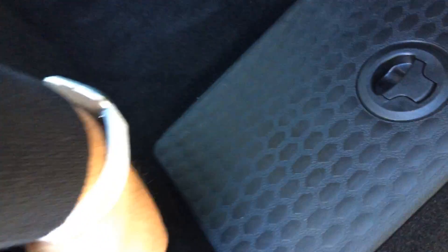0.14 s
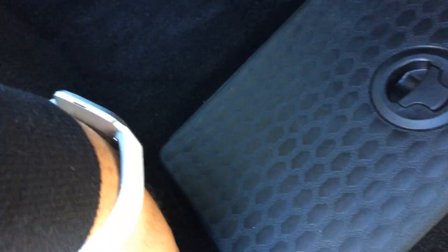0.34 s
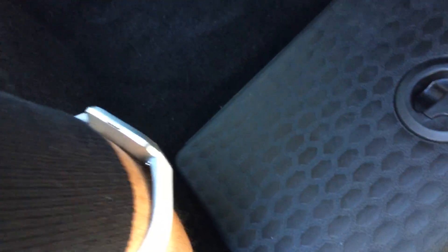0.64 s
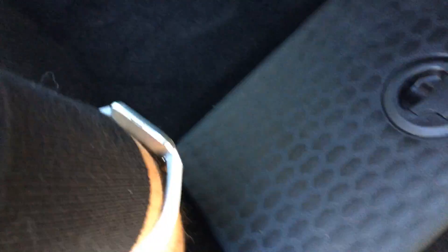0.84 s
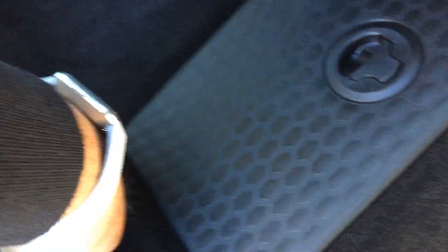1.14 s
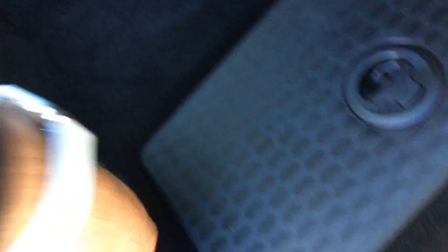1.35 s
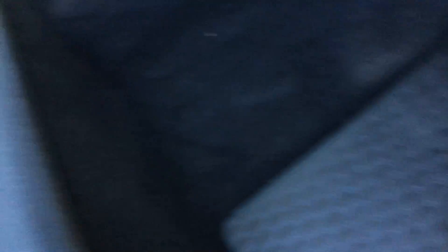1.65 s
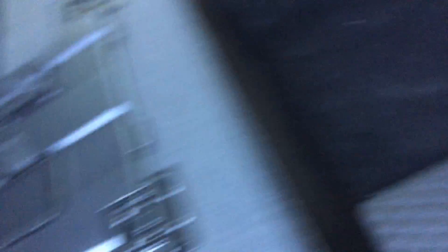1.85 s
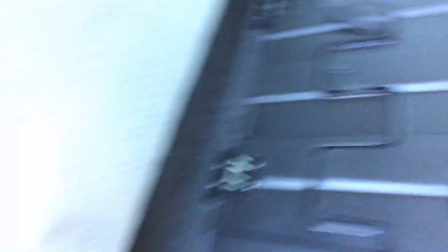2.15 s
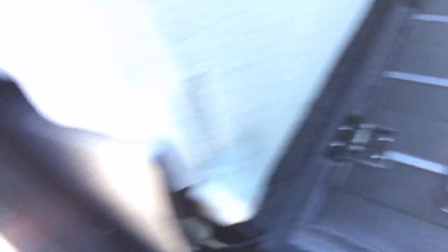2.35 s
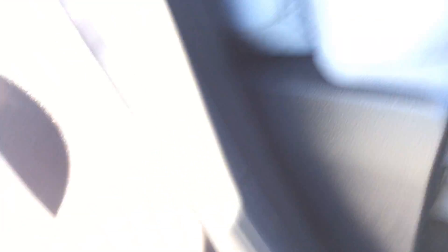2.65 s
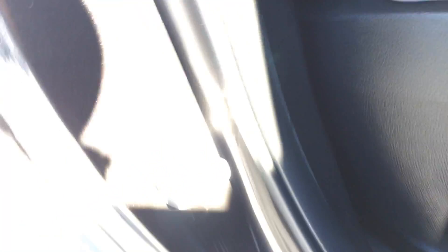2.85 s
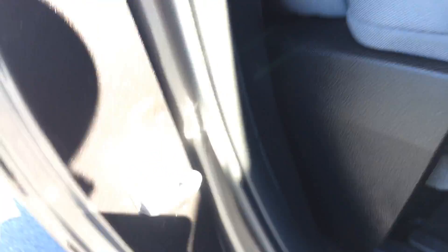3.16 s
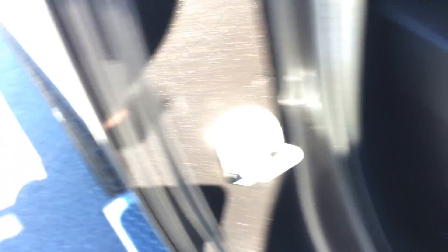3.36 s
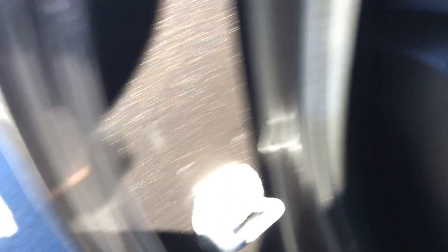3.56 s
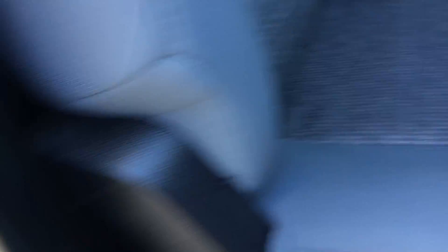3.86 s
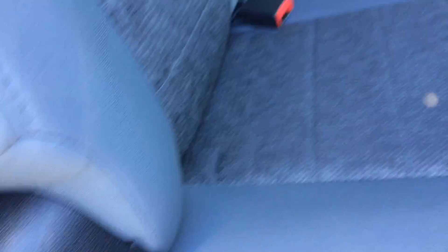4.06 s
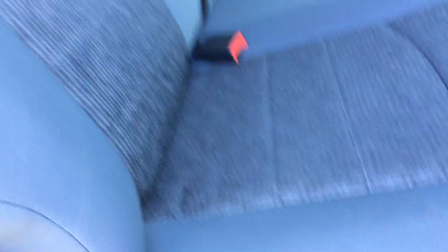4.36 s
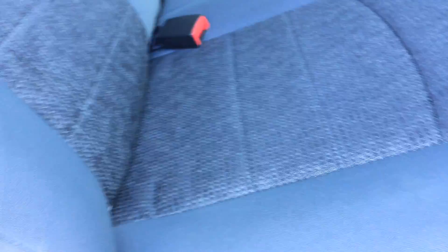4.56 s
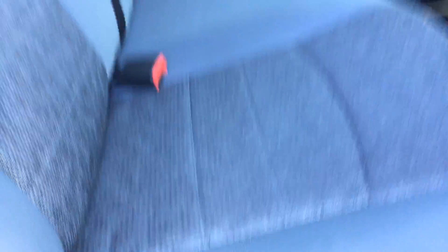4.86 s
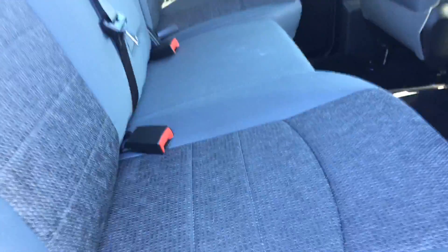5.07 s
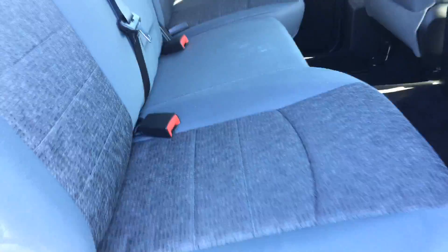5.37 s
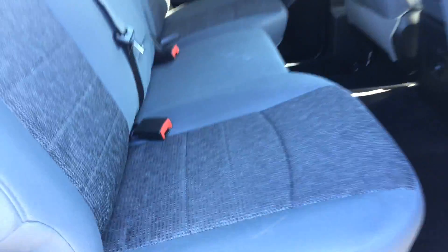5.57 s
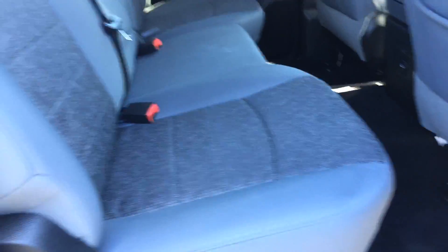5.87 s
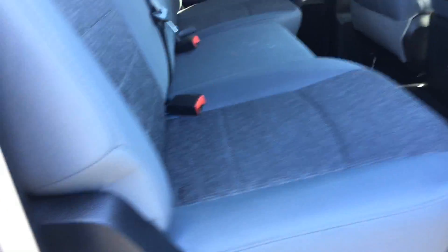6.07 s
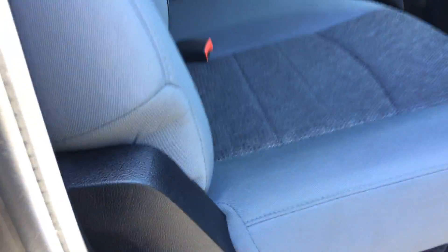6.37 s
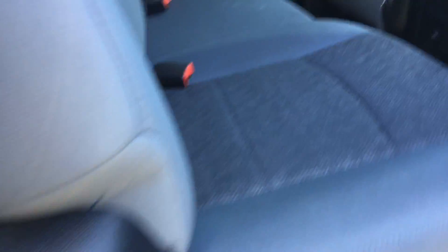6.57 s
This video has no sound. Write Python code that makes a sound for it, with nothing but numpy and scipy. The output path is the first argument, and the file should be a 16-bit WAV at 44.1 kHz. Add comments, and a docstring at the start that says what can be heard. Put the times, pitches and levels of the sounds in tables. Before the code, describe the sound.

Plastic knocks and clicks inside a parked pickup, followed by a seat clattering down with a heavy boom, cloth rustle and faint traffic.

```python
"""Bin lid and folding seat in a pickup

Parked, door open. A plastic floor-bin lid is pressed and snapped shut; the folded rear seat is unlatched
and drops, booming through the cabin. Blows ring damped modes; sleeves and upholstery rub as grainy noise;
trim ticks, buckles rattle. Outside, traffic hums and an engine pulls through two gears."""
import sys
import numpy as np
from scipy import signal
from scipy.fft import rfft, irfft, next_fast_len
from scipy.io import wavfile

SR = 44100
rng = np.random.default_rng(int(sys.argv[2]) if len(sys.argv) > 2 else 0)


def store_wav(level_fs):
    """Save 16-bit WAV to argv[1]."""
    pcm = np.round(np.clip(np.atleast_2d(level_fs), -1, 1) * 32767)
    wavfile.write(sys.argv[1], SR, pcm.T.astype(np.int16))


N = 296925
TIME_S = np.arange(N) / SR
BLOW_S = np.arange(SR // 2) / SR  # time axis of one blow

# cabin rumble (frequency [Hz], level [dB])
RUMBLE_SPECTRUM = [(15, -44.5), (38, -10), (58, 0), (120, 0.5), (170, -9.5), (200, -9.5), (245, -5),
                   (315, -14.5), (360, -21), (600, -53), (1000, -110)]
# course of the rumble (time [s], level [dB])
RUMBLE_LEVELS = [(0, -36.5), (0.95, -44.5), (1.35, -40.5), (1.8, -47.5), (2.5, -39.5), (3.95, -34),
                 (4.6, -41.5), (5.2, -42), (5.55, -36.5), (5.97, -40.5), (6.3, -37.5), (6.73, -37)]
# passing cars (time when nearest [s], level [dB], half-power offset, either sign [s])
CAR_PASSES = [(0.1, -52, 0.94), (1.05, -52, 0.36), (2.42, -49.5, -0.14), (3.519, -46, 0.3761),
              (5.42, -51, -0.11), (6.029, -46, 0.27), (6.6, -47.5, -0.16)]
# tyre wash in the footwell (frequency [Hz], level [dB])
FOOTWELL_SPECTRUM = [(200, -38.5), (380, -14.5), (670, 1), (1030, -1), (1200, -8.5), (1900, -13),
                     (2650, -26.5), (6000, -35.5), (16000, -50.5)]
# tyre wash at the door (frequency [Hz], level [dB])
DOOR_SPECTRUM = [(200, -38), (380, -2.5), (490, -9), (640, -1.5), (760, -3.5), (950, 0.5), (1250, -0.5),
                 (1750, -5.5), (2100, -16), (2500, -22), (3400, -28.5), (16000, -54.5)]
# sleeve on upholstery (frequency [Hz], level [dB])
CLOTH_SPECTRUM = [(1200, -28), (2300, -3), (2850, 2), (3400, -5), (6500, -5.5), (8000, -9), (16000, -16)]
# sleeve slides (time [s], length [s], level [dB])
SLEEVE_SLIDES = [(0.634, 0.8, -66), (1.59, 0.71, -65), (2.696, 0.11, -45.5), (2.978, 0.4, -63),
                 (3.21, 0.61, -51), (3.926, 0.37, -57), (5.795, 0.38, -63.5), (6.295, 0.4, -63)]
# hand and cloth strokes (time [s], length [s], level [dB], centre [Hz], width [octaves])
RUB_STROKES = [(0.025, 0.06, -56.5, 1800, 1.17), (0.119, 0.058, -52.5, 1900, 1.0),
               (0.17, 0.098, -55, 5500, 1.8), (0.405, 0.089, -63.5, 2760, 1),
               (0.558, 0.059, -53.5, 2200, 1.1), (0.923, 0.039, -60.5, 4770, 0.52),
               (1.448, 0.034, -55.5, 4500, 0.61), (1.598, 0.052, -48.5, 3050, 1.05),
               (2.102, 0.059, -44, 5300, 1.7), (2.756, 0.14, -36, 790, 1.5),
               (3.997, 0.082, -59.5, 4450, 2.46), (4.176, 0.096, -58, 3940, 1.4),
               (5.526, 0.14, -41, 475, 1.06), (5.513, 0.092, -55.5, 2960, 0.61)]
# small knocks and pings: trim taps, a latch click, a faint spring ring
# (time [s], level [dB], pitch [Hz], t60 [s], tick [dB])
SMALL_KNOCKS = [(0.15, -32.5, 269, 0.03, -64), (0.2277, -14, 203, 0.079, -34.5),
                (0.2442, -22, 165, 0.084, -45), (1.596, -28, 204, 0.029, -48),
                (1.6205, -34.5, 3030, 0.044, -38), (1.6527, -30, 1940, 0.047, -35.5),
                (1.665, -39, 2290, 0.04, -52), (1.906, -35.5, 540, 0.013, -67),
                (2.158, -28, 666, 0.016, -43), (2.394, -37, 400, 0.0078, -49),
                (3.7043, -36.5, 4760, 0.073, -31.5), (3.8476, -26, 1480, 0.024, -43.5),
                (3.895, -62, 2841, 0.39, -76), (5.16, -27.5, 380, 0.019, -54.5),
                (6.1902, -17.5, 139, 0.065, -67), (6.199, -24.5, 236, 0.053, -73.5)]
# blows on the lid (time [s], body [dB], contact cutoff [Hz], crack [dB])
LID_BLOWS = [(0.2220, -59, 900, -23), (0.2250, -17.5, 254, -24.5), (1.1252, -10.5, 4020, -11),
             (1.1278, -16.5, 1465, -38.5)]
# lid modes (frequency [Hz], level [dB], t60 [s])
LID_MODES = [(131, -8, 0.22), (238.2, 2.5, 0.09), (384, -1, 0.091), (580, -3, 0.045), (638, -7, 0.13),
             (840, -4, 0.066), (954, -1, 0.06), (1220, 5, 0.034), (1402, 2.5, 0.033), (2016, -5, 0.043),
             (2520, 5.5, 0.018), (3660, -5.5, 0.045), (5170, -15, 0.04)]
# short, dry plastic ticks (time [s], level [dB])
PLASTIC_TICKS = [(0.243, -32), (0.2595, -34.5), (0.586, -45), (0.601, -46.5), (1.208, -46), (1.641, -43),
                 (1.663, -41)]
# gear pulls (time [s], length [s], start [Hz], top [Hz], climb exponent, level [dB])
GEAR_PULLS = [(2.33, 0.33, 152.9, 180.3, 2.3, -41.5), (2.719, 0.63, 99.65, 132.6, 0.52, -30.5)]
# seat latch clicks (time [s], level [dB])
LATCH_CLICKS = [(2.7848, -35), (2.8122, -11), (2.8272, -32.5), (2.8435, -35)]
# latch modes (frequency [Hz], level [dB], t60 [s])
LATCH_MODES = [(1030, -13, 0.051), (1656, -12.5, .08), (3660, -18, .054), (4274, -11.5, .05),
               (7822, -16, 0.043)]
# seat frame blows (time [s], body [dB], contact cutoff [Hz], crack [dB])
SEAT_BLOWS = [(2.8497, -10, 3500, -14), (2.8570, -16.5, 4000, -15.5), (2.8615, -11.5, 5000, -8.5),
              (2.8660, -14, 3250, -18.5), (2.8715, -7.5, 614, -19), (2.8815, -29, 1500, -21),
              (2.8965, -32.5, 1184, -34.5), (3.7330, -12, 3060, -14.5), (3.7365, 3.5, 430, -15.5),
              (3.7430, -10.5, 890, -14.5), (3.7515, -13, 1500, -24.5), (3.7632, -28, 1200, -27),
              (3.7758, -17, 1400, -30.5), (3.7835, -44, 1200, -32)]
# seat frame modes (frequency [Hz], level [dB], t60 [s])
SEAT_MODES = [(230, 3, 0.11), (281, 4.5, 0.14), (329.6, -3, 0.24), (423.4, 0.5, 0.14), (695, -8.5, 0.045),
              (827, -3, 0.11), (920, -5, 0.13), (1214, -15.5, 0.039), (1356, -6.5, .1), (1424, -2.5, 0.12),
              (1676, -4, 0.07), (4250, -10, 0.08)]
# cushion landings (time [s], level [dB], contact cutoff [Hz])
CUSHION_THUMPS = [(2.873, -20, 201), (2.8974, -11.5, 150), (3.744, -20.5, 250), (3.7590, 5, 130)]
# cabin air and floor pan modes (frequency [Hz], level [dB], t60 [s])
CABIN_MODES = [(74.4, 3.5, 0.2), (108, -11.5, 0.22), (124.4, -5.5, 0.28), (210.7, -11, 0.26),
               (276.6, -19, 0.65)]
# loose buckle and spring clicks (time [s], level [dB])
RATTLE_CLICKS = [(5.5235, -43), (5.5300, -44.5), (5.5750, -45), (5.5958, -38), (5.6230, -53)]
# buckle and spring modes (frequency [Hz], level [dB], t60 [s])
RATTLE_MODES = [(313.3, 4, 0.27), (548, -0.5, 0.34), (1054, -2, 0.084), (2830, -7.5, .09), (3370, -8, 0.12),
                (3980, -9, 0.095), (5800, -14, .05)]

# noise spectra (frequency [Hz], level [dB]); DENSE: a crowd of weak modes
HISS_SPECTRUM = [(3000, 0), (9000, -6), (16000, -9.5)]
KNOCK_TICK = [(500, 10), (2500, 8), (6000, -3), (10000, -13), (15000, -11.5)]
LID_DENSE = [(60, -23), (150, 9), (500, 1.5), (1400, -8.5), (3000, -16), (8000, -37.5)]
LID_CRACK = [(300, -58.5), (1200, -9), (3000, 3), (5500, 3), (9500, -1.5), (15000, -10.5)]
STEEL_CRACK = [(700, -21), (2500, 3.5), (4500, 0.5), (8000, -4), (15000, -13.5)]
STEEL_BUZZ = [(70, 2.5), (700, -40)]
SEAT_DENSE = [(70, -5.5), (250, 5), (800, -2), (1600, -3.5), (4000, -20.5), (9000, -36.5)]
SEAT_CRACK = [(400, -17.5), (1400, 0.5), (2500, -0.5), (4200, 0.5), (7500, -8), (11000, -18),
              (15500, -15.5)]
TRUCK_SHUDDER = [(35, -19.5), (65, 0.5), (130, -3), (500, -47.5)]


def undb(db):
    """Decibels to gain."""
    return 10 ** (np.asarray(db) / 20)


def unit(x):
    """Scale to rms 1."""
    return x / np.sqrt(np.mean(x ** 2))


def add(track, at_s, sound):
    """Mix a sound into the track."""
    start = int(at_s * SR)
    track[start:start + len(sound)] += sound[:N - start]


def cut(x, hz, kind, order=2):
    """Butterworth low-pass or high-pass."""
    return signal.sosfilt(signal.butter(order, hz, kind, fs=SR, output="sos"), x)


def noise(spectrum, size=N):
    """Coloured noise, rms 1."""
    hz, db = np.transpose(spectrum)
    padded = next_fast_len(size)
    bins_hz = np.maximum(np.fft.rfftfreq(padded, 1 / SR), 1)
    gain = undb(np.interp(np.log(bins_hz), np.log(hz), db))
    return unit(irfft(rfft(rng.standard_normal(padded)) * gain, padded)[:size])


def walk(rate_hz):
    """Slow random wander, spread near 1."""
    knots = rng.standard_normal(int(N / SR * rate_hz) + 2)
    return np.interp(TIME_S * rate_hz, np.arange(len(knots)), knots)


def swell(at_s, length_s, attack_s, release_s):
    """Linear rise, hold, exponential release."""
    attack = ((TIME_S - at_s) / attack_s).clip(0, 1)
    return attack * np.exp(-np.maximum(TIME_S - at_s - length_s, 0) / release_s)


def rise(rise_s):
    """Build-up of contact force."""
    return (BLOW_S / rise_s).clip(0, 1)


def fade(t60_s):
    """Exponential decay of one blow."""
    return undb(-60 * BLOW_S / t60_s)


def ring(modes):
    """Damped modes set off together."""
    return sum(undb(db) * fade(t60_s) * np.sin(2 * np.pi * hz * BLOW_S) for hz, db, t60_s in modes)


def reflect(x, echo_db, drift):
    """Glass, door and roof echo a few ms late; the combs slide as the microphone moves. Rms 1."""
    out = x
    for lag_s in np.geomspace(0.0019, 0.009, 5):
        delay_s = lag_s * (1 + drift * walk(2))
        out = out + undb(echo_db) * np.interp(TIME_S - delay_s, TIME_S, x)
    return unit(out)


def traffic():
    """Rumble and wavering hum; tyre wash swells per car and opens as the microphone leaves the footwell."""
    rumble_db = np.interp(TIME_S, *np.transpose(RUMBLE_LEVELS))
    rumble = noise(RUMBLE_SPECTRUM) * undb(0.56 * walk(6.5))
    phase = 2 * np.pi * np.cumsum(120 * (1 + 0.03 * walk(8.1))) / SR
    hum = undb(-12 + 2.3 * walk(5.4)) * np.sin(phase)
    hum += undb(-14.5 + 2.1 * walk(4.6)) * np.sin(2 * phase)
    car_power = sum(undb(db) ** 2 / (1 + ((TIME_S - at_s) / near_s) ** 2)  # inverse square law
                    for at_s, db, near_s in CAR_PASSES)
    far_road_power = undb(-63) ** 2
    wash_db = 10 * np.log10(car_power + far_road_power) + 0.48 * walk(13)
    door_share = np.interp(TIME_S, [1.95, 2.25], [0.016, 0.96])
    wash = np.sqrt(1 - door_share) * noise(FOOTWELL_SPECTRUM) + np.sqrt(door_share) * noise(DOOR_SPECTRUM)
    return undb(rumble_db) * (rumble + hum) + undb(wash_db) * reflect(wash, echo_db=-12.5, drift=0.13)


def hiss():
    """Faint, even microphone self-noise."""
    return undb(-73) * noise(HISS_SPECTRUM)


def friction(spectrum, size, grain_db):
    """Fibres catch and slip: noise whose level jumps about every ms."""
    catches = np.repeat(rng.standard_normal(size // 48 + 1), 48)[:size]
    return unit(noise(spectrum, size) * undb(grain_db * catches))


def sleeve():
    """A sleeve slides over upholstery, duller when slow, never quite still."""
    sliding = sum(undb(db) * swell(at_s, length_s, attack_s=0.23, release_s=0.035)
                  for at_s, length_s, db in SLEEVE_SLIDES)
    resting = undb(-73)
    level_db = 20 * np.log10(np.hypot(sliding, resting)) + walk(7.7)
    bright = reflect(friction(CLOTH_SPECTRUM, N, grain_db=-0.5), echo_db=-8.5, drift=0.15)
    dull = cut(bright, 2800, "low", order=1)
    speed = undb(2.3 * (level_db + 48)).clip(0, 1)
    return (dull + speed * (bright - dull)) * undb(level_db)


def rubs():
    """Short strokes over plastic and cloth: bands of friction noise."""
    out = np.zeros(N)
    bands_hz = np.geomspace(50, 18000, 24)
    for at_s, length_s, db, centre_hz, octaves in RUB_STROKES:
        bands_db = -4.5 * (np.log2(bands_hz / centre_hz) / octaves) ** 2
        rub = friction(np.column_stack([bands_hz, bands_db]), len(BLOW_S), grain_db=2.5)
        progress = BLOW_S / (length_s / 2)
        stroke = (progress * np.exp(1 - progress)) ** 3  # peaks mid-stroke
        add(out, at_s, undb(db) * rub * stroke)
    return out


def crack(spectrum, t60_s, tail_db, tail_t60_s):
    """Hard contact: a noise burst and its short scatter round the cabin."""
    return noise(spectrum, len(BLOW_S)) * (fade(t60_s) + undb(tail_db) * fade(tail_t60_s))


def knocks():
    """Small knocks and pings: a tick, a damped mode and a weaker inharmonic one above."""
    out = np.zeros(N)
    for at_s, db, hz, t60_s, tick_db in SMALL_KNOCKS:
        body = ring([(hz, 0, t60_s), (hz * 1.2, -5, t60_s * 0.52)])
        tick = crack(KNOCK_TICK, t60_s=0.016, tail_db=-4.5, tail_t60_s=0.12)
        add(out, at_s, undb(db) * body + undb(tick_db) * tick)
    return cut(out, 41, "high")


def struck(blows, modes, modes_db, dense, dense_db, dense_t60_s, rise_s, highpass_ratio, **crack_shape):
    """Blows ring main and dense modes; soft contact dulls both, hard contact is too short for bass."""
    out = np.zeros(N)
    # adjacent modes move in opposite directions at the contact
    tone = undb(modes_db) * (ring(modes[::2]) - ring(modes[1::2]))
    for at_s, body_db, contact_hz, crack_db in blows:
        body = tone + undb(dense_db) * noise(dense, len(BLOW_S)) * fade(dense_t60_s)
        body = cut(body, highpass_ratio * contact_hz, "high")
        body = cut(body, contact_hz, "low")
        blow = undb(body_db) * body + undb(crack_db) * crack(**crack_shape)
        add(out, at_s, rise(rise_s) * blow)
    return out


def lid():
    """The plastic lid gives under the hand, then snaps home."""
    return struck(LID_BLOWS, LID_MODES, modes_db=-6, dense=LID_DENSE, dense_db=-4, dense_t60_s=0.12,
                  rise_s=0.0002, highpass_ratio=0.028,
                  spectrum=LID_CRACK, t60_s=0.016, tail_db=-28.5, tail_t60_s=0.14)


def plastic_ticks():
    """Short, dry plastic ticks, including the lid's rebound after it snaps shut."""
    out = np.zeros(N)
    for at_s, db in PLASTIC_TICKS:
        bright = cut(rng.standard_normal(len(BLOW_S)), 4000, "high", order=1)
        add(out, at_s, undb(db) * bright * fade(0.012))
    return out


def engine(sag_hz_per_s=69):
    """Distant firing tone with a trace of its octave: climbs under throttle, then sags and fades."""
    out = np.zeros(N)
    for at_s, length_s, start_hz, top_hz, exponent, db in GEAR_PULLS:
        climb = ((TIME_S - at_s) / length_s).clip(0, 1) ** exponent
        coasting_s = (TIME_S - at_s - length_s).clip(0, 1)
        firing_hz = start_hz + (top_hz - start_hz) * climb - sag_hz_per_s * coasting_s
        phase = 2 * np.pi * np.cumsum(firing_hz * (1 + 0.006 * walk(25.14))) / SR
        tone = np.sqrt(2) * (np.sin(phase) + undb(-19.5) * np.sin(2 * phase))
        throttle = swell(at_s, length_s, attack_s=0.12, release_s=0.19)
        out += throttle * undb(db + 0.42 * walk(3.2)) * tone
    return out


def steel(clicks, modes, top_hz):
    """Small steel parts: a click, then a ring blurred by their buzzing in loose mounts."""
    out = np.zeros(N)
    for at_s, db in clicks:
        click = crack(STEEL_CRACK, t60_s=0.018, tail_db=-25.5, tail_t60_s=0.1)
        buzz = sum(ring([mode]) * noise(STEEL_BUZZ, len(BLOW_S)) for mode in modes)
        add(out, at_s, undb(db) * rise(0.001) * cut(click + buzz, top_hz, "low", order=4))
    return out


def latch():
    """The seat's steel latch clicks free."""
    return steel(LATCH_CLICKS, LATCH_MODES, top_hz=15000)


def seat():
    """The unlatched frame clatters down on its stops."""
    return struck(SEAT_BLOWS, SEAT_MODES, modes_db=-10.5, dense=SEAT_DENSE, dense_db=-1, dense_t60_s=0.11,
                  rise_s=0.00083, highpass_ratio=0.16,
                  spectrum=SEAT_CRACK, t60_s=0.028, tail_db=-18.5, tail_t60_s=0.091)


def boom():
    """The cushion's weight shakes floor pan and cabin air; the truck body shudders."""
    out = np.zeros(N)
    cabin = ring(CABIN_MODES)
    for at_s, db, contact_hz in CUSHION_THUMPS:
        shudder = undb(-23) * noise(TRUCK_SHUDDER, len(BLOW_S)) * fade(0.29)
        add(out, at_s, undb(db) * cut(cabin + shudder, contact_hz, "low", order=1))
    return cut(out, 50, "high", order=4)


def rattle():
    """Loose buckles and seat springs jingle."""
    return steel(RATTLE_CLICKS, RATTLE_MODES, top_hz=7100)


def scene():
    """Mono sum at the hand-held microphone."""
    background = traffic() + hiss()
    handling = sleeve() + rubs() + knocks() + lid() + plastic_ticks()
    return (background + handling + engine() + latch() + seat() + boom() + rattle())[None]


def follow(x, attack_s, release_db_per_s):
    """Level in dB: smoothed, caught at each peak, released at a steady rate."""
    step = 1 / (attack_s * SR)
    level_db = 20 * np.log10(signal.lfilter([step], [1, step - 1], np.abs(x)) + 1e-9)
    release_db = release_db_per_s * TIME_S
    return np.maximum.accumulate(level_db + release_db) - release_db


def record(dry):
    """A limiter ducks after the loudest thump; soft clip and low-pass follow."""
    threshold_db, ceiling, top_hz = -4.5, 1.03, 16000
    level_db = follow(dry[0], attack_s=0.0086, release_db_per_s=7.5)
    limited = dry * undb(-np.maximum(0, level_db - threshold_db))
    rounded = limited / (1 + (limited / ceiling) ** 6) ** (1 / 6)
    return signal.sosfilt(signal.ellip(10, 0.2, 80, top_hz, fs=SR, output="sos"), rounded)


dry = scene()
out = record(dry)
store_wav(out)
```